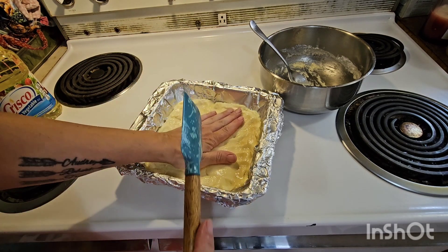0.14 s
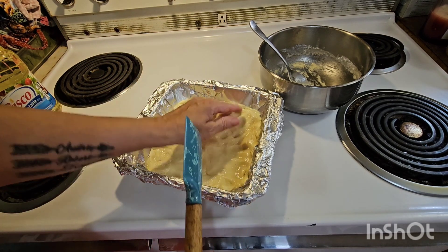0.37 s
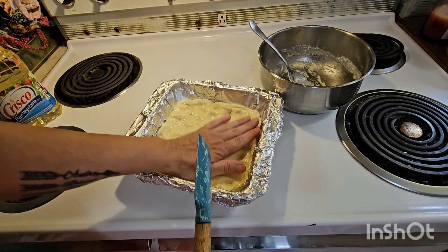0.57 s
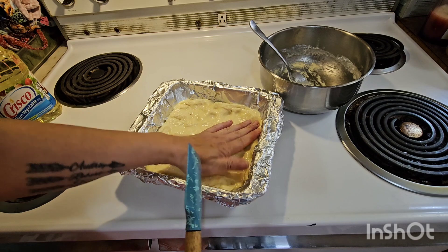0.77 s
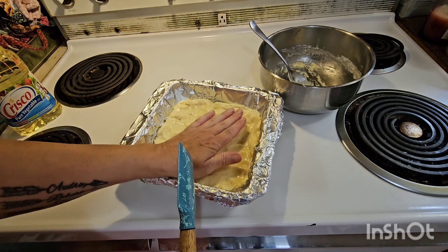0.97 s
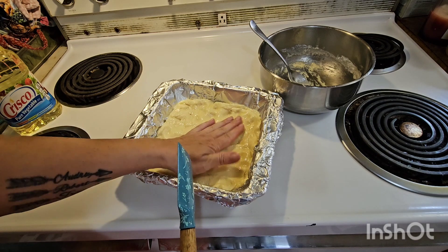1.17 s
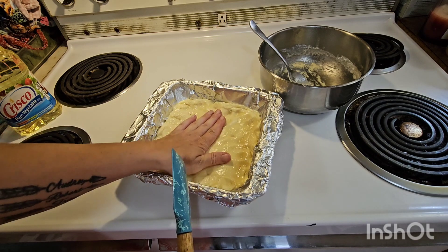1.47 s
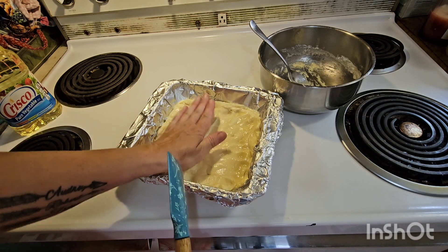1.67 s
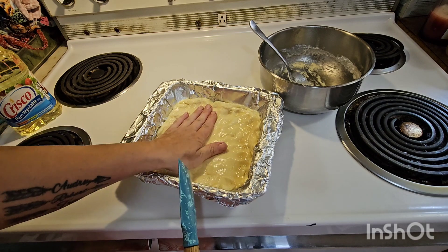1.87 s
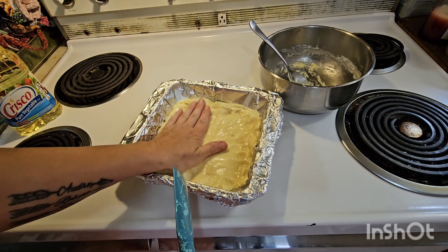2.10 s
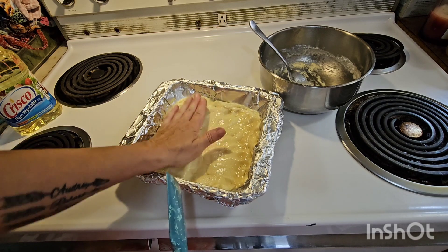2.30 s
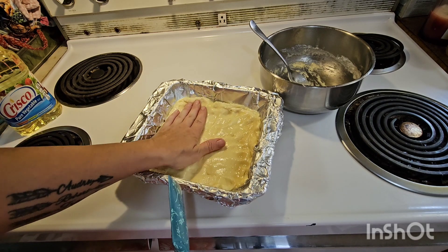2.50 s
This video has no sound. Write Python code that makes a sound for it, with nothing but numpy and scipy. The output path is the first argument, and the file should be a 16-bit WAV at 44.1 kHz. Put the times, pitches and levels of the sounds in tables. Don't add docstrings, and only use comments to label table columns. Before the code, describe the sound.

Aluminium foil crackles under a palm pressing sticky dough. After near quiet, a sharp bright cluster snaps at 0.24-0.33 s, then smaller ticks around 0.4 and 0.7. Pats with dull smacks and soft thumps follow at 0.8-1.1, a strong pair near 1.2, then 1.6, 1.95-2.0 and 2.3. Foil rustles between; short kitchen reverberation, faint refrigerator hum and hiss, close phone pickup.

```python
import sys
import numpy as np
from scipy import signal
from scipy.fft import rfft, irfft, next_fast_len
from scipy.io import wavfile
from scipy.ndimage import uniform_filter1d

SR = 44100
rng = np.random.default_rng(int(sys.argv[2]) if len(sys.argv) > 2 else 0)


def invert_db(level):
    return 10 ** (np.asarray(level, dtype=float) / 20)


def store_pcm(level_fs):
    pcm = np.round(np.clip(level_fs, -1, 1) * 32767).astype(np.int16)
    wavfile.write(sys.argv[1], SR, np.atleast_2d(pcm).T)


N = 116865


def unit(x):
    return x / np.sqrt(np.mean(x ** 2) + 1e-20)


def along(points, hz):
    point_hz, value = np.transpose(points)
    return np.interp(np.log(hz + 1), np.log(point_hz + 1), value)


def filtered(x, response):
    n = x.shape[-1]
    m = next_fast_len(n + 4096)
    return irfft(rfft(x, m) * response(np.fft.rfftfreq(m, 1 / SR)), m)[..., :n]


def bell(hz, centre_hz, octaves):
    return np.exp(-(np.log2((hz + 1) / centre_hz) / octaves) ** 2)


def sides(left_db):
    return invert_db([[left_db], [-left_db]])


def add(out, s, x):
    k = round(s * SR)
    out[:, k:k + x.shape[1]] += x[:, :N - k]
    return out


def paired(x, alike):
    def angle(hz):
        return np.arccos(np.clip(along(alike, hz), -1, 1)) / 2
    mid, side = filtered(x, lambda hz: np.array([np.cos(angle(hz)), np.sin(angle(hz))]))
    return np.array([mid + side, mid - side])


def patchy(n, fade):
    patch_db = 3
    hz, t, z = signal.stft(rng.standard_normal((2, n)), SR, nperseg=64)
    field = uniform_filter1d(rng.standard_normal(z.shape[1:]), size=4, axis=0)
    field = uniform_filter1d(field, size=5, axis=1)
    z = z * invert_db(patch_db * unit(field)) * fade(hz, t)
    return signal.istft(z, SR, nperseg=64)[1][:, :n]


# pitch_hz, level_db (per Hz)
HISS_COLOUR = [(710, -34.5), (1200, -7.5), (1950, -10), (2390, -17.5), (4980, -25.5), (7510, -14.5),
               (9620, -48), (12100, -21), (15800, -22.5)]


def hiss():
    noise = rng.standard_normal((2, N))
    return invert_db(-72.5) * unit(filtered(noise, lambda hz: invert_db(along(HISS_COLOUR, hz))))


# pitch_hz, level_db (per Hz)
RUMBLE_COLOUR = [(15, -54), (30, -24), (41, -13), (130, -14.5), (170, -16.5), (250, -14.5), (420, -14),
                 (1500, -35.5), (3300, -120)]
# pitch_hz, likeness (0 to 1)
RUMBLE_ALIKE = [(60, 1), (250, 0.76), (700, 0.41), (1500, 0.1)]
# pitch_hz, level_db, width_hz
MOTOR_LINES = [
    (77, -73, 3.3),
    (229.1, -63.5, 1.63),
    (260, -62, 43.4),
    (370.3, -70.5, 3),
]


def fridge():
    noise = filtered(rng.standard_normal((2, N)), lambda hz: invert_db(along(RUMBLE_COLOUR, hz)))
    hum = invert_db(-60) * unit(paired(noise, RUMBLE_ALIKE))
    for pitch_hz, db, width_hz in MOTOR_LINES:
        line = filtered(rng.standard_normal(N), lambda hz: 1 / (1 + ((hz - pitch_hz) / width_hz) ** 2))
        hum = hum + invert_db(db) * unit(line)
    return hum * sides(.8)


# start_s (of the peak), level_db, pitch_hz
STOVE_THUDS = [
    (0.679, -56, 45),
    (0.808, -54, 131),
    (0.982, -67, 68),
    (1.399, -57, 70.6),
    (1.651, -47.5, 74.4),
    (1.801, -54.5, 65),
    (1.99, -55, 52.3),
    (2.418, -51.5, 59.4),
    (2.493, -55, 70),
]


def stove():
    swing_s = 0.012
    t = np.arange(N) / SR
    out = np.zeros(N)
    for s, db, pitch_hz in STOVE_THUDS:
        swell = np.exp(-((t - s) / swing_s) ** 2)
        out += invert_db(db) * swell * np.sin(2 * np.pi * pitch_hz * (t - s))
    return out * sides(.7)


# pitch_hz, level_db (per Hz)
PHONE_COLOUR = [(300, -31), (900, -18), (1500, -10), (5500, -9.5), (8500, -3), (10300, -16), (12000, -2),
                (15500, -8)]
# pitch_hz, level_db
LEFT_OVER_RIGHT = [(300, -25), (1200, 4), (3800, 1.3), (8000, -0.4), (15000, -5.5)]


def phone(hz):
    dip_db = -14.5 * np.exp(-((hz - 9530) / 197) ** 2)
    lean_db = along(LEFT_OVER_RIGHT, hz) * np.array([[.5], [-.5]])
    return invert_db(along(PHONE_COLOUR, hz) + dip_db + lean_db)


# pitch_hz, lead_radians
LEFT_LEADS = [(500, 0), (1100, .6), (2200, .4), (4500, .9), (7000, 3), (10500, 7), (13000, 10), (16500, 14)]


def late(hz):
    return np.exp(1j * along(LEFT_LEADS, hz) * np.array([[.5], [-.5]]))


# pitch_hz, likeness (0 to 1)
CLOSE_ALIKE = [(400, 0.87), (1400, 0.56), (2500, 0.32), (5000, 0.19)]
# start_s, level_db
RUSTLE_PRESSURE = [(0, -74.5), (.18, -69.5), (.23, -49), (0.422, -56.5), (.48, -86), (.67, -67),
                   (.72, -57.5), (.85, -46.5), (1.03, -66), (1.19, -77), (1.32, -57.5), (1.5, -71),
                   (1.64, -57.5), (1.88, -69), (2.0, -70), (2.25, -54), (2.584, -68), (2.604, -48)]


def rustle():
    grains_per_s, grain_db, blur_t60_s = 220, 4.5, 0.033
    wash = .9
    s, db = np.transpose(RUSTLE_PRESSURE)
    size = np.minimum(rng.exponential(size=N), 3)
    grains = (rng.random(N) < grains_per_s / SR) * invert_db(grain_db * size)
    fall = invert_db(-60 * np.arange(SR // 20) / SR / blur_t60_s)
    blur = signal.fftconvolve(grains, fall)[:N]
    x = paired(patchy(N, lambda hz, t: 1) * (wash + unit(blur)), CLOSE_ALIKE)
    x = unit(filtered(x, lambda hz: phone(hz) * late(hz)))
    return x * invert_db(np.interp(np.arange(N) / SR, s, db))


# pitch_hz, t60_s
FOIL_RING = [(1000, 0.072), (4000, 0.053), (14000, 0.058)]
# pitch_hz, t60_s
KITCHEN_DECAY = [(1000, 0.24), (4000, 0.25), (14000, 0.19)]


def tail():
    def dying(t60s, hz, t):
        fall = invert_db(-60 * t / along(t60s, hz)[:, None])
        return fall / np.sqrt(t60s[1][1] * SR / 14)

    def fade(hz, t):
        return np.hypot(invert_db(-2.5) * dying(FOIL_RING, hz, t), invert_db(-6.5) * dying(KITCHEN_DECAY, hz, t))
    return patchy(SR // 3, fade)


def burst(out, s, db, length_ms, colour, lead_db, wet_db):
    lead = SR // 40
    creak_s, rise_over_fall = .009, 0.42
    crease_db, splinter_db, patch_db = 1.8, 2.6, 2
    t = (np.arange(SR // 3) - lead) / SR
    wide = np.clip(length_ms, .4, 8) / 1000

    def lumpy(depth_db, size):
        lumps = np.repeat(rng.standard_normal(len(t) // size + 1), size)
        return invert_db(depth_db * lumps[:len(t)])

    u = (t - rise_over_fall * wide) / wide
    shape = np.exp(-(1.19 * u / np.where(u < 0, rise_over_fall, 1)) ** 2)
    shape = shape + invert_db(lead_db) * np.exp(-np.abs(u) * wide / creak_s)
    snap = rng.standard_normal((2, len(t))) * lumpy(crease_db, size=14) * shape
    patches = list(zip(np.geomspace(700, 16000, num=14), patch_db * rng.standard_normal(14)))
    snap = filtered(snap, lambda hz: invert_db(along(patches, hz)))

    answer = np.pad(invert_db(wet_db) * tail()[:, :-lead], ((0, 0), (lead, 0)))
    swell = np.clip(t / wide / 1.14, 0, 1) ** 2 * lumpy(splinter_db, size=60)
    x = snap / np.linalg.norm(snap[0]) + answer * swell
    x = filtered(paired(x, CLOSE_ALIKE), lambda hz: colour(hz) * late(hz))
    x = x / np.sqrt(np.mean(x[:, :2 * lead] ** 2)) * invert_db(db - 11)
    return add(out, s - lead / SR, x)


# start_s, level_db (peak), pitch_hz
PALM_THUMPS = [
    (.81, -52.5, 696),
    (.84, -50.5, 425),
    (.925, -45.5, 480),
    (1.232, -40, 487),
    (1.602, -48.5, 484),
    (1.667, -51.5, 627),
    (2.28, -48, 450),
    (2.351, -49, 590),
]


def palm():
    out = np.zeros((2, N))
    for s, db, pitch_hz in PALM_THUMPS:
        def colour(hz):
            return bell(hz, pitch_hz, octaves=.7) * sides(.8)
        out = burst(out, s, db + 2, 2.85, colour, lead_db=-40, wet_db=7.5)
    return out


# start_s, level_db (peak), pitch_hz, length_ms
DOUGH_SMACKS = [(0.302, -39, 2040, 2), (1.417, -50, 1980, 1.5), (1.4254, -42.5, 2270, 1),
                (0.144, -50, 4730, 1.2), (0.236, -27, 2530, 1.7), (.408, -40, 4340, 3.5),
                (0.706, -40.5, 4860, 2.7), (.69, -45, 5500, 2.3), (0.329, -41, 1300, 4.2),
                (1.667, -33.5, 1520, 6.2), (1.686, -51, 2800, 0.96), (1.929, -45.5, 4370, 0.66),
                (2.001, -44, 3140, 1.3), (2.129, -48.5, 2270, 1.2), (2.282, -48, 5760, 2),
                (.812, -36.5, 5900, 1.1), (0.099, -51, 1900, 0.97), (0.142, -42, 2780, 0.49),
                (0.1434, -47, 1590, 0.53), (0.208, -35, 1570, 3.7), (.209, -39.5, 2640, 1.7),
                (0.236, -25, 1740, 1.2), (0.621, -54.5, 1820, 1.7), (0.8395, -32, 3020, 1.5),
                (0.842, -35.5, 1460, 1.8), (.978, -39.5, 1590, 6.4), (1.083, -34.5, 2200, 2.7),
                (1.085, -31.5, 1530, 3.1), (1.207, -29.5, 1740, 1.1), (1.3, -59, 1890, 1.5),
                (1.927, -37.5, 2250, 0.94), (1.946, -25.5, 2230, 1.5), (1.949, -33, 4500, 0.88),
                (1.999, -37, 1290, 4.6), (2.142, -44, 2010, 0.79), (2.279, -26, 4600, 3.6),
                (2.28, -33.5, 1350, 1.4), (2.35, -30, 3270, 4.2), (2.419, -42.5, 2010, 4.5),
                (2.634, -42.5, 1730, 5.8)]


def dough():
    out = np.zeros((2, N))
    for s, db, pitch_hz, length_ms in DOUGH_SMACKS:
        def colour(hz):
            return bell(hz, pitch_hz, octaves=.38) * sides(1.5) + invert_db(-10) * phone(hz)
        out = burst(out, s, db - 5.5, length_ms, colour, lead_db=-40, wet_db=-4.5)
    return out


# start_s, level_db (peak), tilt_db (per octave), length_ms, creak_db (before the snap)
FOIL_SNAPS = [(0.2366, -13.5, 2, 1.6, -44), (0.263, -25.5, -0.5, 1.3, -20), (0.2914, -19.5, 2.5, 0.49, -47),
              (0.333, -25.5, 2.5, 4.4, -6.5), (.707, -33.5, 3.5, 1.1, -1), (0.8116, -32, 2, 3.3, -22),
              (0.9254, -22, 1, 2.5, -38), (1.084, -31, -0.2, 2.7, -40), (1.2074, -25, 2, 1.5, -16),
              (1.2325, -16, 0.5, 1.3, -11), (1.2627, -17.5, 2, 2.4, -10), (1.6006, -17, 2, 3.3, -24),
              (1.665, -17, 3.5, 1.44, -15), (1.9458, -16, 2.5, 2.2, -24), (2.0186, -16, 3, 2.9, -21),
              (2.2794, -13.5, 3.5, 2.25, -22.5), (2.3507, -17.5, 2.5, 1.4, -16)]
# start_s, level_db (peak), tilt_db (per octave), length_ms
FOIL_TICKS = [(0.191, -54, -9, 1.8), (1.2282, -21, 6, 0.68), (1.546, -55, 5, 2.6), (1.569, -47, 4, 3),
              (1.644, -39.5, -6.5, 3.5), (1.962, -49, 1, 1.3), (2.159, -50, -1.5, 1.2),
              (2.334, -50, 4, 1.2), (2.5645, -81, 7, 0.71), (2.607, -62, 11, 1.5),
              (0.3964, -41.5, -3.5, 4.4), (.404, -38, -2.5, 1.8), (.41, -36.5, -3.5, 3.2),
              (0.4253, -47, 5, 0.62), (0.439, -54, -4, 1.7), (0.545, -48, -2.5, 0.98),
              (0.618, -49.5, -1.3, 1.7), (0.69, -49.5, -1, 2), (.719, -59, 9, 1.5), (0.8037, -47, -1, 3.2),
              (0.8631, -42.5, -5.5, 2.5), (0.9156, -47, -4, 2.4), (0.9546, -35.5, -1, 3),
              (1.1688, -42, 6.5, 0.45), (1.2193, -33, -3.5, 0.81), (1.4242, -39, -2, 2.1),
              (1.686, -37, -1, 2.7), (2.1273, -43, -1, 3.3), (2.236, -40, 11, 1.7), (2.328, -41, -7.5, 3),
              (2.5945, -44, 4.5, 0.44)]


def foil():
    creases = [(*snap, 0) for snap in FOIL_SNAPS]
    for s, db, tilt_db, length_ms in FOIL_TICKS:
        wet_db = 1.5 + 5 * np.log2(min(length_ms / 2, 1))
        creases.append((s, db, tilt_db, length_ms, -28, wet_db))
    out = np.zeros((2, N))
    for s, db, tilt_db, length_ms, creak_db, wet_db in creases:
        def colour(hz):
            return phone(hz) * invert_db(tilt_db * np.log2((hz + 300) / 6000))
        out = burst(out, s, db - 2, length_ms, colour, creak_db, wet_db)
    return out


def scene():
    return hiss() + fridge() + stove() + rustle() + palm() + dough() + foil()


def roll_off(x):
    return signal.sosfilt(signal.butter(12, 16970, fs=SR, output="sos"), x)


def record(dry):
    ceiling, top_hz, shelf_db = .42, 15800, -33
    soft = dry / (1 + np.abs(dry / ceiling) ** 3) ** (1 / 3)

    def top_band(hz):
        return invert_db(shelf_db * np.clip((hz - top_hz) / 250, 0, 1)) * (hz < 16850)
    kept = filtered(soft, top_band)
    return roll_off(kept)


dry = scene()
out = record(dry)
store_pcm(out)
```